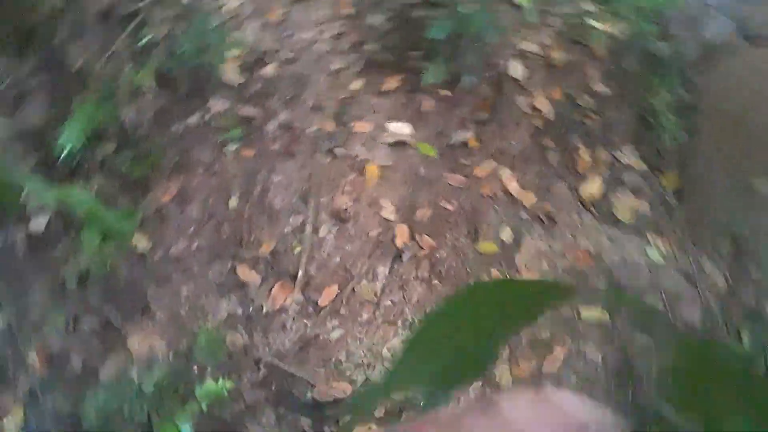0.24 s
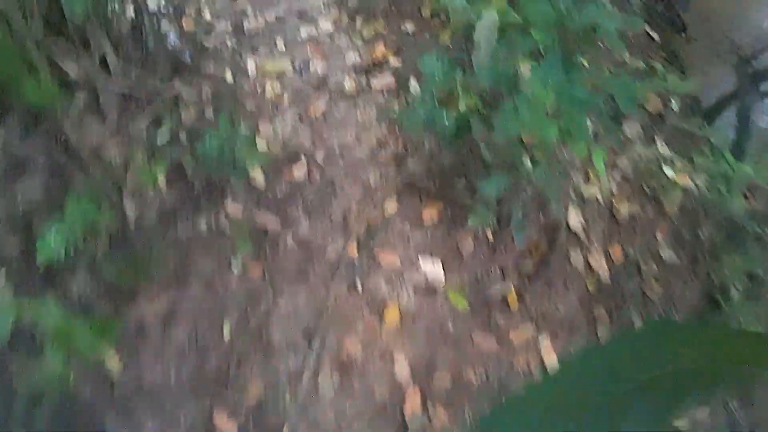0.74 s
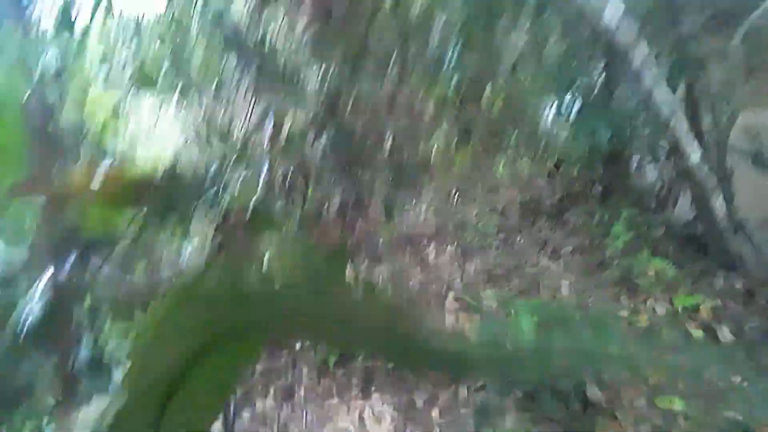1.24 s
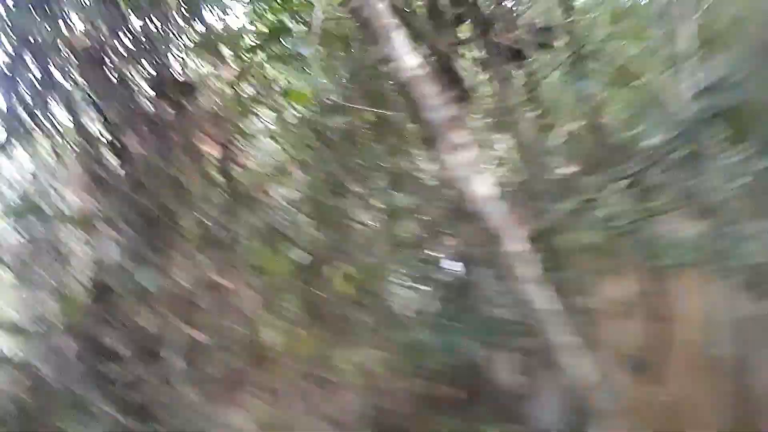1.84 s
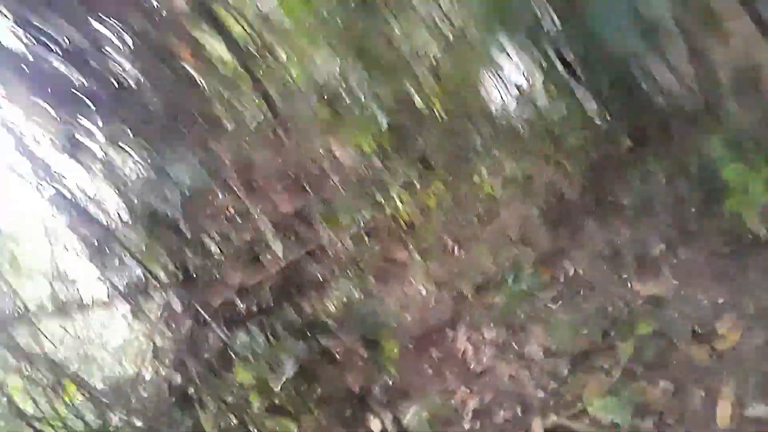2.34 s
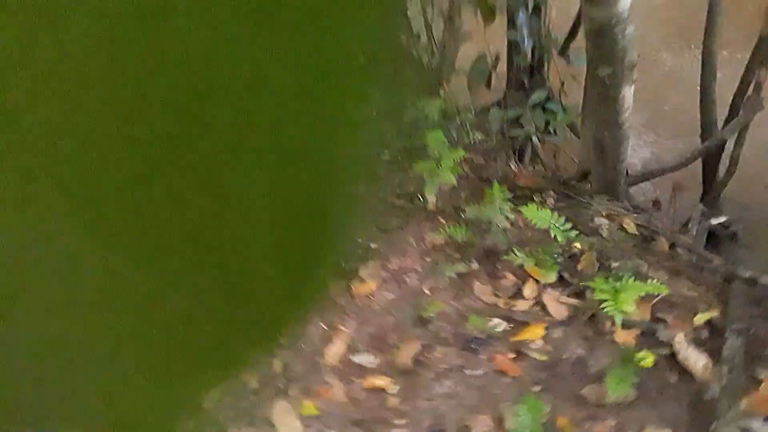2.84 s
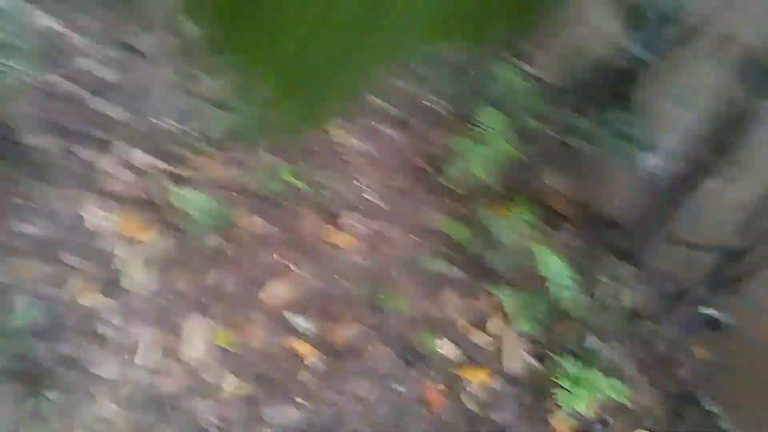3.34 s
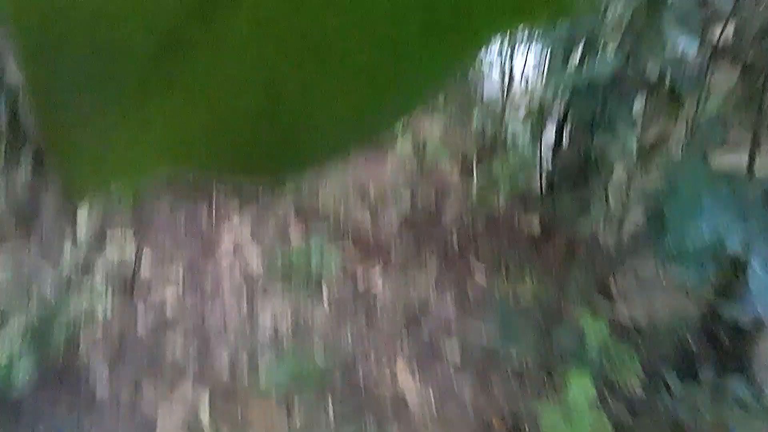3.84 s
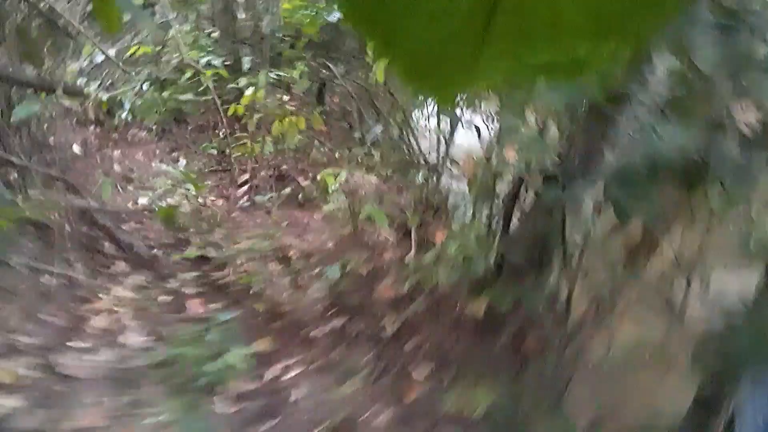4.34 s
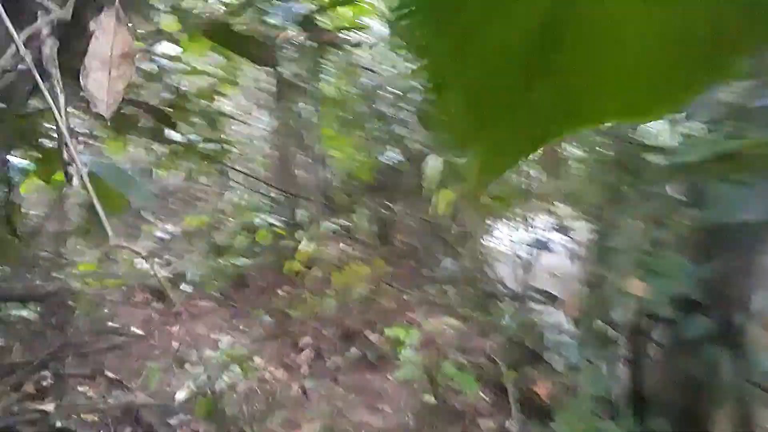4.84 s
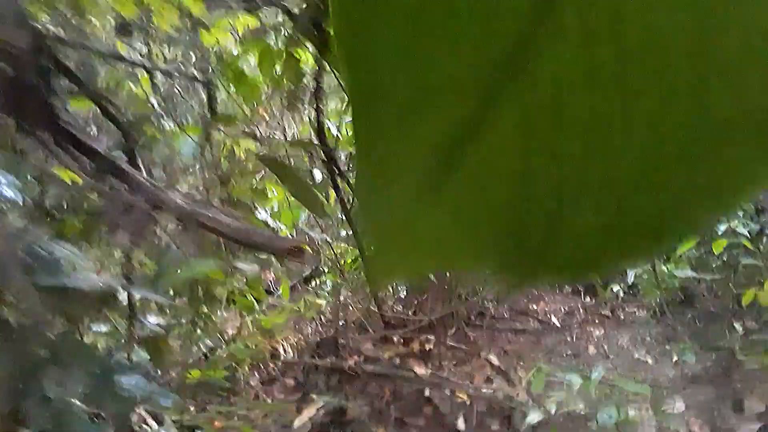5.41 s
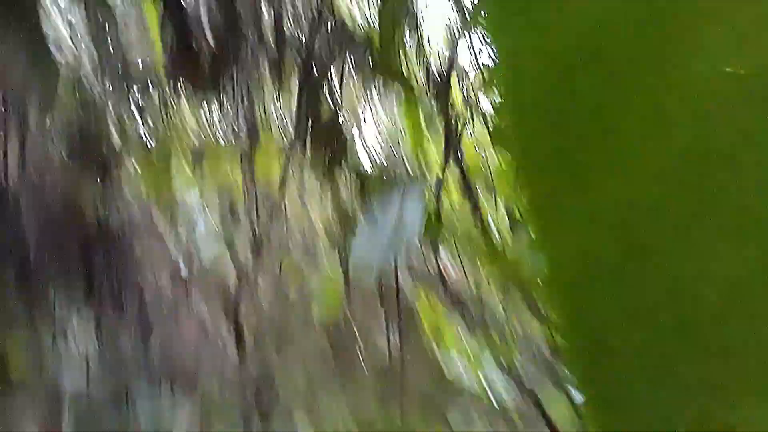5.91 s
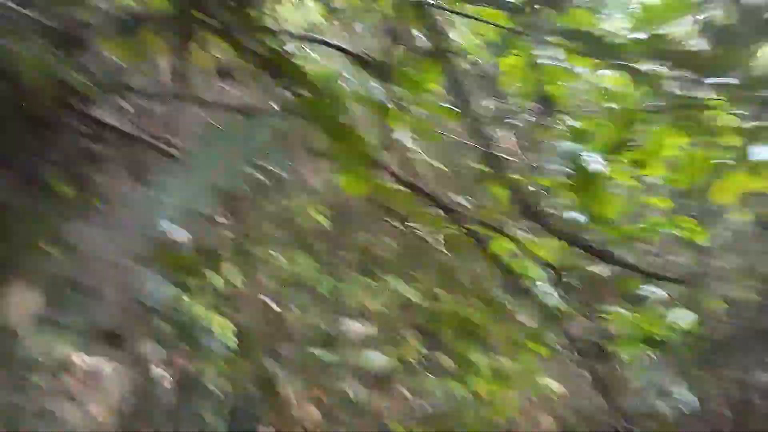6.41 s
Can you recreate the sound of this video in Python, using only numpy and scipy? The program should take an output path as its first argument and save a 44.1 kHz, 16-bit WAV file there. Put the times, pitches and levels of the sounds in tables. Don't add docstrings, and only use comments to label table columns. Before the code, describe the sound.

Even rainfall patter in a wood, with sharp close drop ticks, brief leaf swishes, and dull hollow thumps and rumbles against a handheld microphone.

```python
import sys
import numpy as np
from scipy import signal
from scipy.fft import rfft, irfft
from scipy.io import wavfile

SR = 44100
rng = np.random.default_rng(int(sys.argv[2]) if len(sys.argv) > 2 else 0)


def persist_wave(psi):
    counts = np.round(np.clip(psi, -1, 1) * 32767).astype(np.int16)
    wavfile.write(sys.argv[1], SR, np.atleast_2d(counts).T)


def magnitude_from_level(level_db):
    exponent = np.asarray(level_db, float) / 20
    return 10 ** exponent


N = 294147

# t/s, level/dB, facing the canopy/dB
RAIN_COURSE = [(0.0, -29.5, -0.5), (0.33, -29.5, 1), (1.47, -29.5, -0.3), (1.84, -29.5, 1),
               (2.84, -28.5, 0), (3.16, -30, 1.6), (3.73, -29.5, -0.5), (4.01, -29.5, 0), (4.35, -31, 0.3),
               (4.9, -32.5, 1), (5.42, -30.5, 1), (5.98, -30.5, 0.1), (6.35, -31, .1), (6.67, -30, 3)]
# f/Hz, level/dB (per Hz)
RAIN_SPECTRUM = [(30, -40), (60, -28.5), (230, -8), (480, -3), (1050, -0.5), (2200, -1.5), (4000, 0),
                 (6400, -4), (8000, -1.5), (8700, -8), (9500, -16.5), (11000, -14), (12700, -11),
                 (15600, -14.5)]
PATTER_FACING, SPRAY_FACING = -0.79, 0.68

# t/s, peak level/dB, ring f/Hz
LEAF_TAPS = [(1.082, -16, 4710), (2.352, -8, 7540), (2.4162, -12, 7900), (2.9205, -19, 2600),
             (2.6572, -12, 2190), (2.8444, -10.5, 2320), (3.19, -13, 4430), (3.43, -11, 3640),
             (3.4508, -13, 2600), (3.5162, -17, 3800), (3.7396, -18, 3880), (3.668, -13.5, 3890),
             (3.6865, -27, 2520), (3.4515, -10, 8060), (3.603, -15, 3000), (3.7944, -5, 2700),
             (3.7952, -6.5, 4280), (3.876, -19, 4630), (4.005, -12, 6500), (4.0567, -12.5, 8330),
             (4.1074, -14.5, 3100), (4.161, -12, 8050), (4.1756, -6.5, 7200), (4.538, -9.5, 3880),
             (5.239, -15, 5980), (5.565, -16, 4870), (5.615, -14, 3430), (6.1324, -12, 6240),
             (6.375, -16.5, 4180), (6.416, -10, 7400)]
SPLASH_T60_S, SPLASH_GROWTH_DB = 0.011, 50
# t/s, peak level/dB
SPRAY_SPITS = [(.2593, -30), (1.0645, -22), (1.1199, -30), (2.3521, -17), (2.4159, -19), (2.5296, -28),
               (2.5556, -26), (2.5745, -23), (2.6748, -26), (2.8065, -22), (2.8444, -24.5), (3.1597, -17),
               (3.1896, -21), (3.2116, -28), (3.4286, -26), (3.6858, -22), (3.7945, -26), (3.8801, -20),
               (4.0123, -20), (4.0427, -20), (4.1047, -22), (4.5501, -29), (4.6468, -31), (4.6653, -25),
               (5.239, -30), (5.5343, -25), (6.0681, -25.5), (6.1125, -26.5), (6.4153, -35), (6.5211, -29)]
SPIT_T60_S = 0.011
PORT_STEP_HZ = 8300

# t/s, length/s, hiss level/dB, spray level/dB
LEAF_BRUSHES = [(1.504, 0.032, -35, -46), (2.34, 0.025, -46, -42), (3.15, 0.016, -32, -44),
                (3.863, 0.04, -34, -44), (3.936, .06, -41, -41), (4.001, 0.018, -44, -31),
                (4.015, 0.033, -35, -37), (4.103, 0.013, -28.5, -35), (4.145, 0.041, -45, -37),
                (4.166, 0.041, -32.5, -45), (4.636, 0.075, -38, -42), (5.868, 0.047, -38, -41),
                (6.097, 0.027, -43, -47)]

# start t/s, hold/s, rumble level/dB, scuff level/dB
CASE_RUBS = [(1.2, 0.25, -60.5, -47.5), (1.504, .4, -51, -50), (2.0, 0.19, -38, -59),
             (2.283, 0.046, -40, -45), (2.486, 0.12, -54, -58), (2.678, .1, -64, -44),
             (2.88, .04, -49, -48), (2.922, .05, -35, -37), (2.998, 0.13, -46, -50),
             (3.123, 0.082, -36, -39.5), (3.24, 0.054, -46, -38.5), (3.367, 0.079, -35.5, -35.5),
             (3.534, .03, -38, -48), (3.564, 0.053, -22, -32), (3.7, 0.11, -40, -41),
             (3.823, 0.15, -36.5, -39), (3.96, 0.088, -34.5, -42), (4.112, 0.27, -42.5, -42),
             (4.43, 0.34, -46, -44), (4.859, 0.21, -45.5, -45.5), (5.125, 0.23, -40, -40.5),
             (5.374, 0.14, -35, -36.5), (5.64, 0.026, -39.5, -35.5), (5.768, 0.097, -49, -42.5),
             (6.076, 0.081, -46, -52), (6.195, .02, -42, -46), (6.25, .04, -48, -55),
             (6.307, 0.032, -36.5, -42), (6.42, .25, -52.5, -48)]
RUB_RISE_DB_PER_S, RUB_FALL_DB_PER_S = 1200, 400

# t/s, peak level/dB, ring f/Hz, shudder t60/s, crack level/dB (to peak)
LEAF_SLAPS = [(1.027, -20.5, 520, 0.013, -22), (2.658, -21.5, 600, 0.044, 0),
              (2.8458, -14.5, 342, 0.097, 5), (2.92, -12.5, 595, 0.098, -4), (2.948, -15, 380, 0.098, -18),
              (3.115, -20.5, 248, 0.14, 6.5), (3.155, -21, 1200, .023, -20), (3.2104, -23.5, 253, 0.096, 4),
              (3.432, -25.5, 403, 0.21, 13.5), (3.517, -14.5, 527, 0.099, -4), (3.5605, -1.5, 165, 0.14, 0),
              (3.6028, -6, 283, 0.073, -6), (3.7042, -15.5, 190, 0.11, -19), (3.7947, -21, 730, 0.077, 4),
              (3.9635, -26, 308, 0.062, 5), (4.0373, -22.5, 317, 0.09, 7), (4.576, -26, 934, 0.033, -5),
              (4.9931, -7.5, 730, 0.04, -6), (5.1604, -17, 544, 0.032, 1), (5.263, -20.5, 227, 0.079, 2.5),
              (5.3731, -14.5, 294, 0.11, 6.5), (5.5665, -28.5, 597, 0.065, -14),
              (6.1905, -13.5, 490, .04, -2.5), (6.309, -20, 594, .05, -8)]
SHUDDER_DB, SHUDDER_SLOPE = -2.5, -0.28
# t/s, peak level/dB, ring f/Hz, shudder
# level/dB (to peak)
MORE_CONTACTS = [(0.0446, -21.5, 910, -5.5), (.797, -36, 490, 8), (2.07, -21, 146, -15),
                 (2.183, -22, 139, -11), (2.2338, -12.5, 112, -3), (2.327, -21, 150, -20),
                 (2.365, -23.5, 118, -14), (2.4443, -25, 940, 1.5), (2.5572, -28, 880, 5.5),
                 (3.588, -9.5, 268, -5), (3.226, -18, 905, -9), (3.3, -19, 191, -8),
                 (3.615, -4.5, 300, -14), (3.6855, -15.5, 960, -3.5), (3.857, -20, 145, -11),
                 (4.2891, -27.5, 466, 1), (6.317, -16.5, 330, -11), (5.2, -30, 350, -2),
                 (3.1145, -16.5, 746, -3.5), (5.4758, -7, 1060, -21), (6.193, -15.5, 187, -2),
                 (5.61, -21.5, 182, -5), (5.8556, -33, 124, 9), (5.9536, -27.5, 194, 0.5),
                 (6.5043, -24, 430, -6), (6.6482, -24.5, 385, -10), (2.93, -10.5, 566, -5.5),
                 (3.443, -28, 400, 7), (4.9942, -17, 327, -9), (5.6155, -17.5, 1000, -11)]
KNOCK_T60_S, KNOCK_CRACK_DB = 0.072, -25

# f/Hz, width/Hz, level/dB
CASE_RESONANCES = [
    (138, 12, -6.5),
    (338, 23, -21),
    (680, 20, -15.5),
]

# t/s, centre f/Hz
CHANNEL_PATCHES = [(.419, 7000), (.596, 8950), (.596, 11100), (.885, 10300), (1.246, 12200), (1.352, 13150),
                   (1.433, 6730), (1.853, 5950), (1.853, 6900), (2.025, 4760), (2.025, 8300),
                   (2.107, 10300), (4.273, 9100), (4.832, 5200), (4.832, 7600), (5.729, 11100),
                   (6.446, 14400)]
BLOCK, BLOCK_START = 1024, 944
PATCH_WIDTH_HZ, PATCH_DB = 1500, -38


def rms_one(x):
    return x / np.sqrt(np.mean(x ** 2) + 1e-20)


def in_time(rows):
    s, *columns = np.transpose(rows)
    return [np.interp(np.arange(N) / SR, s, c) for c in columns]


def band(x, low_hz, high_hz, order=2):
    edges = [low_hz, min(high_hz, .45 * SR)]
    return signal.sosfilt(signal.butter(order, edges, "band", fs=SR, output="sos"), x)


def drift(rate):
    r = np.exp(-80 * np.pi * rate / SR)
    slow = signal.lfilter([1], [1, -2 * r, r * r], rng.standard_normal(N // 40 + 2002))
    slow = rms_one(slow[2000:])
    return np.interp(np.arange(N) / 40, np.arange(len(slow)), slow)


def add(out, s, sound):
    i = round(s * SR)
    out[i:i + len(sound)] += sound[:N - i]


def hit(hz, cycles, tail_t60, tail_db, spread, noise):
    t = np.arange(len(noise)) / SR
    knock = -np.sin(2 * np.pi * hz * t) * magnitude_from_level(-60 * t * hz / cycles)
    knock = band(knock, hz / 1.32, hz * 1.76, order=1)
    fall_db = 60 * t / max(tail_t60, .003)
    dull = rms_one(band(noise, hz / spread, hz * 1.3))
    bright = rms_one(band(noise[::-1], min(hz * 1.15, .4 * SR), hz * 2.26 * np.sqrt(spread)))
    tail = dull * magnitude_from_level(tail_db - fall_db) + bright * magnitude_from_level(tail_db + 1 - 2.85 * fall_db)
    return knock / np.abs(knock).max() + tail * np.minimum(t * hz, 1)


def rain(far_db, near_db, per_s):
    chance = per_s * magnitude_from_level(2.0 * drift(15)) / SR
    grains = (rng.random(N) < chance) * rng.choice([-1, 1], N)
    grains = grains * magnitude_from_level(3.5 * np.minimum(rng.exponential(1, N), 3.5))
    far = magnitude_from_level(far_db + .5 * drift(29)) * rng.standard_normal(N)
    source = far + magnitude_from_level(near_db) * rms_one(grains)

    hz = np.maximum(np.fft.rfftfreq(N, 1 / SR), 1)
    point_hz, point_db = np.transpose(RAIN_SPECTRUM)
    spectrum = rfft(source) * magnitude_from_level(np.interp(np.log(hz), np.log(point_hz), point_db))
    to_hiss = np.clip(np.log(hz / 1800) / np.log(1.9), 0, 1)
    to_spray = np.clip((hz - 8300) / 900, 0, 1)
    parts = [irfft(spectrum * w, N) for w in (1 - to_hiss, to_hiss - to_spray, to_spray)]

    level_db, facing_db = in_time(RAIN_COURSE)
    levels = [level_db + PATTER_FACING * facing_db, level_db, level_db + SPRAY_FACING * facing_db]
    mix = np.zeros(N)
    for part, db in zip(parts, levels):
        mix += part * magnitude_from_level(db - db[:SR].mean() + 0.067 * drift(7.4))
    return mix / np.std(sum(parts)) * magnitude_from_level(-31.5)


def drops():
    taps, noise = np.zeros(N), rng.standard_normal((len(LEAF_TAPS), 900))
    for (s, db, hz), row in zip(LEAF_TAPS, noise):
        t60 = SPLASH_T60_S * 10 ** ((db + 14) / SPLASH_GROWTH_DB)
        tap = hit(hz, cycles=9.0, tail_t60=t60, tail_db=-6.5, spread=1.98, noise=row)
        add(taps, s + 0.00046, magnitude_from_level(db - 3.5) * tap)
    spits, noise = np.zeros(N), rng.standard_normal((len(SPRAY_SPITS), 600))
    for (s, db), row in zip(SPRAY_SPITS, noise):
        spit = hit(13800, cycles=4.7, tail_t60=SPIT_T60_S, tail_db=-10.5, spread=1.47, noise=row)
        add(spits, s + 0.00096, magnitude_from_level(db + 2.5) * spit)
    return band(taps, 410, PORT_STEP_HZ, order=4) + band(spits, 9500, 17000, order=3)


def brushes():
    out, noise = np.zeros(N), rng.standard_normal((len(LEAF_BRUSHES), 3, 4000))
    for (s, length, hiss_db, spray_db), (dull, fine, grit) in zip(LEAF_BRUSHES, noise):
        size = min(round(length * SR), 4000)
        crackle = magnitude_from_level(2.1 * rms_one(band(grit, 60, 500)))
        hiss = magnitude_from_level(hiss_db) * rms_one(band(dull * crackle, 2700, PORT_STEP_HZ, order=4))
        spray = magnitude_from_level(spray_db) * rms_one(band(fine * crackle, 10900, 20000, order=3))
        swell = np.sin(np.pi * np.arange(size) / size) ** 0.33
        add(out, s, (hiss + spray)[:size] * swell)
    return out


def handling():
    t = np.arange(0, N + 64, 64)[:, None] / SR
    s, hold, *levels = np.transpose(CASE_RUBS)
    rise_db = RUB_RISE_DB_PER_S * np.maximum(s - t, 0)
    fall_db = RUB_FALL_DB_PER_S * np.maximum(t - s - hold, 0)
    gains = []
    for db in levels:
        gain = np.linalg.norm(magnitude_from_level(db - rise_db - fall_db), axis=1)
        gains.append(np.interp(np.arange(N) / SR, t[:, 0], gain))
    rumble_gain, scuff_gain = gains
    lumps = magnitude_from_level(2.5 * drift(30))
    rumble = rms_one(lumps * band(rng.standard_normal(N), 56, 199))
    scuff = rms_one(lumps * magnitude_from_level(3.2 * drift(41)) * band(rng.standard_normal(N), 233, 940))
    return rumble_gain * rumble + scuff_gain * scuff


def thumps():
    contacts = []
    for s, db, hz, t60, crack_db in LEAF_SLAPS:
        contacts.append((s, db, hz, t60, SHUDDER_DB + SHUDDER_SLOPE * (db + 15), crack_db))
    for s, db, hz, shudder_db in MORE_CONTACTS:
        contacts.append((s, db, hz, KNOCK_T60_S, shudder_db, KNOCK_CRACK_DB))
    out, noise = np.full(N, 1e-18), rng.standard_normal((len(contacts), 2, 7000))
    crack = np.concatenate([-np.hanning(30), .45 * np.hanning(60)])
    for (s, db, hz, t60, shudder_db, crack_db), (row, low) in zip(contacts, noise):
        ring = hit(hz, cycles=6.0, tail_t60=t60, tail_db=shudder_db, spread=1.77, noise=row)
        add(out, s, magnitude_from_level(db - 3.5) * ring)
        add(out, s, magnitude_from_level(db + crack_db + 1.0) * crack)
        deep_db = db + shudder_db - 18.0 - 4.5 * np.log2(hz / 150)
        deep = hit(125, cycles=0.7, tail_t60=4.9 * t60, tail_db=-0.5, spread=1.84, noise=low)
        add(out, s + 0.0035, magnitude_from_level(deep_db) * deep)
    return out


def through_case(x):
    out = x.copy()
    for hz, width_hz, db in CASE_RESONANCES:
        r = np.exp(-np.pi * width_hz / SR)
        poles = [1, -2 * r * np.cos(2 * np.pi * hz / SR), r * r]
        out += magnitude_from_level(db) * signal.lfilter([(1 - r * r) / 2, 0, (r * r - 1) / 2], poles, x)
    return magnitude_from_level(-1.5) * band(out, 50, 5200)


def scene():
    air = rain(far_db=0., near_db=-4.0, per_s=1500.) + drops() + brushes()
    mono = air + through_case(handling() + thumps())
    return np.array([mono, mono])


def channel_patches():
    side, noise = np.zeros(N), rng.standard_normal((len(CHANNEL_PATCHES), 2 * BLOCK))
    window = signal.windows.kaiser_bessel_derived(2 * BLOCK, 4 * np.pi) ** 3
    hz = np.fft.rfftfreq(2 * BLOCK, 1 / SR)
    for (s, centre_hz), row in zip(CHANNEL_PATCHES, noise):
        db = PATCH_DB + np.interp(centre_hz, *np.transpose(RAIN_SPECTRUM))
        block = round((s * SR - BLOCK_START) / BLOCK)
        patch = rms_one(irfft(rfft(row) * (np.abs(hz - centre_hz) < PATCH_WIDTH_HZ / 2)))
        add(side, (BLOCK_START + (block - 1) * BLOCK) / SR, magnitude_from_level(db) * window * patch)
    return side


def low_pass(x):
    return signal.sosfilt(signal.butter(12, 16670, fs=SR, output="sos"), x)


def record(dry):
    x = signal.sosfilt(signal.butter(3, 50, "high", fs=SR, output="sos"), dry)
    x = 1.59 * np.tanh(x / 1.421)
    x = signal.sosfiltfilt(signal.cheby2(16, 50, 15880, fs=SR, output="sos"), x)
    mix = x + channel_patches() * [[1], [-1]]
    return low_pass(mix)


dry = scene()
out = record(dry)
persist_wave(out)
```